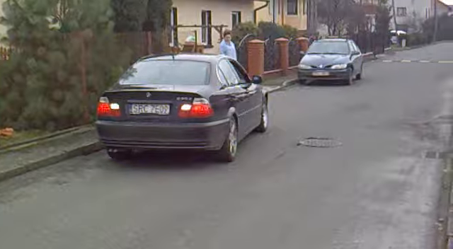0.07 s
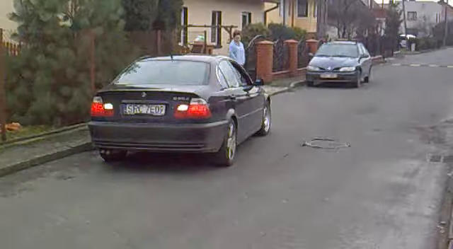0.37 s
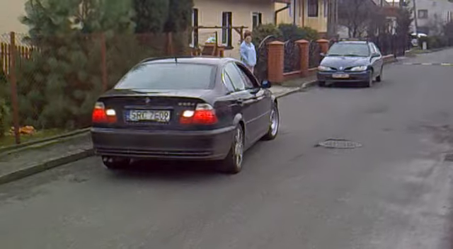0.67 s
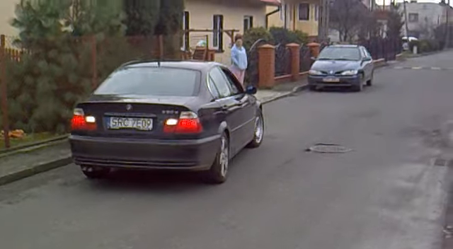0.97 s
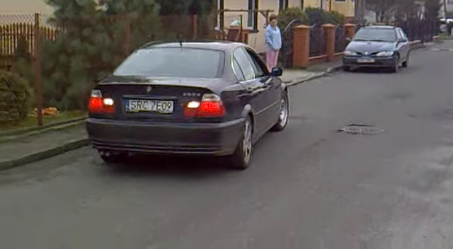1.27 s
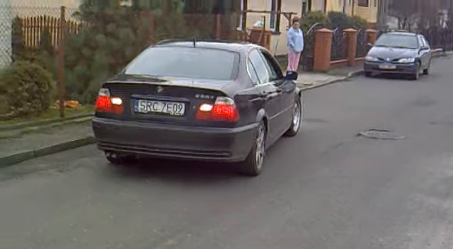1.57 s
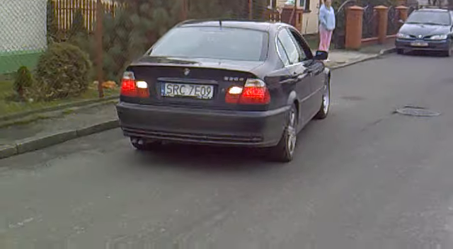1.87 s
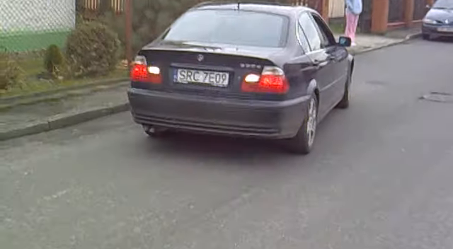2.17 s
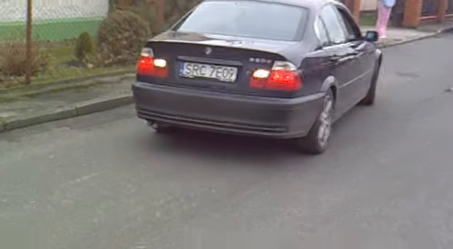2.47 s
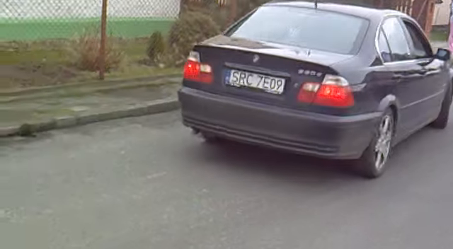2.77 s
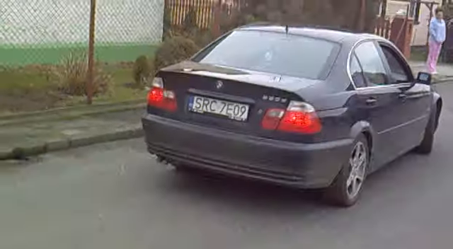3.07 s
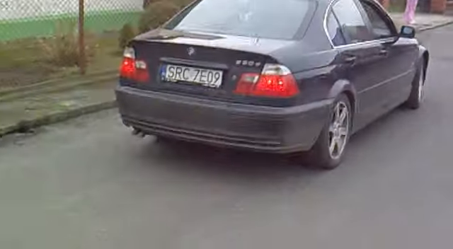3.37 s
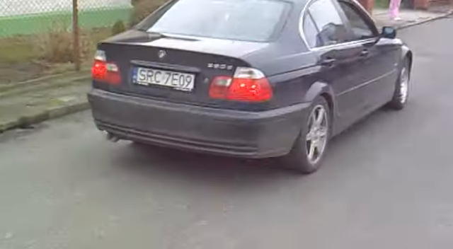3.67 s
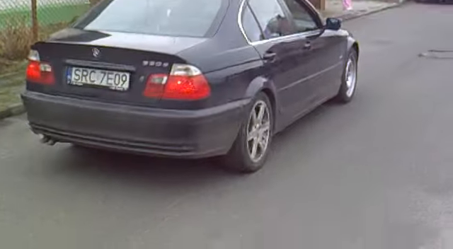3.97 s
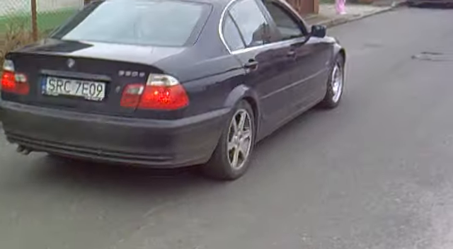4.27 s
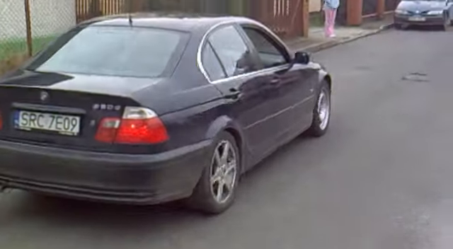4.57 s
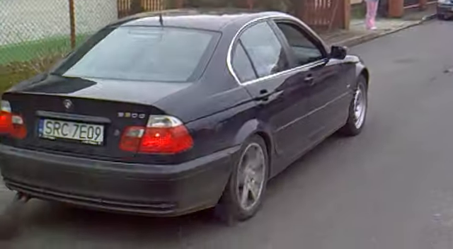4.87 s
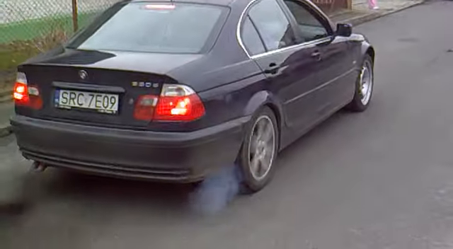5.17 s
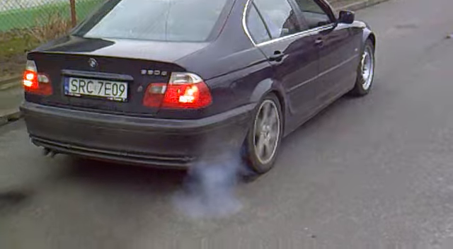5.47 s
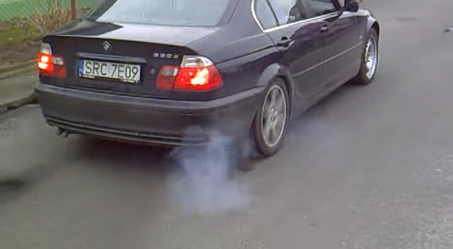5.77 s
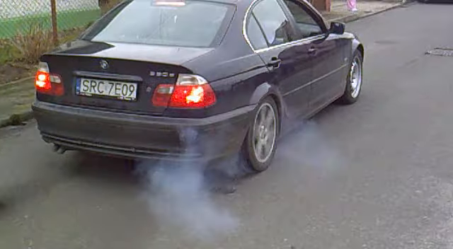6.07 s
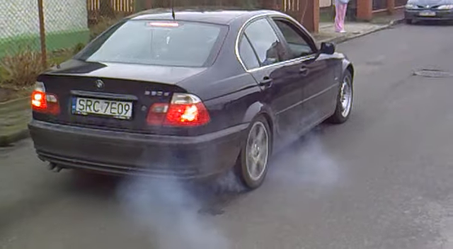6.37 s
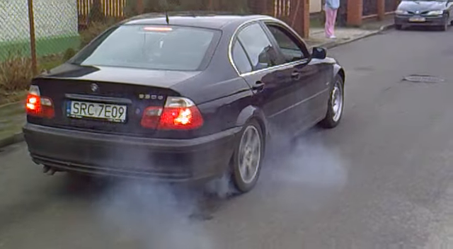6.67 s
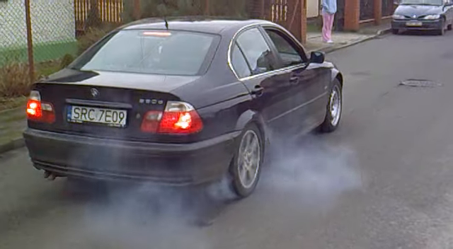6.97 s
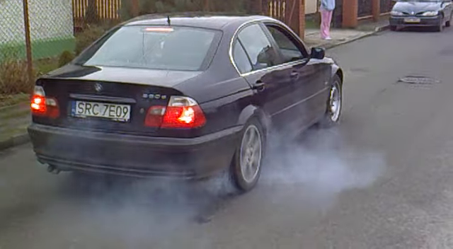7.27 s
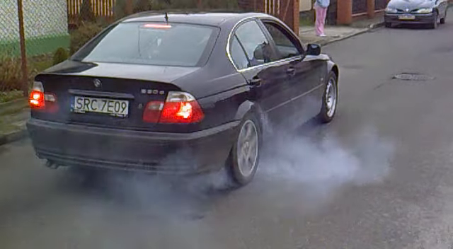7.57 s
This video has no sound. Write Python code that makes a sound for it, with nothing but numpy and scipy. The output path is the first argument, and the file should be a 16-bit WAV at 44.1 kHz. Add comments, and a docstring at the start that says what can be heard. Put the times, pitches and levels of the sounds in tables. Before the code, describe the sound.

A diesel car idles quietly on a street, then revs hard and spins its rear tyres in a loud, ragged screech.

```python
"""A quiet street between house fronts, heard through one small microphone. First, a hard double click.
The sound swells up: a six-cylinder diesel saloon backs at idle, exhaust humming under the engine's knock.
Gusts bump the microphone, small ticks sound close by, and the rolling tyres scuff faintly.
At 3.6 s the engine revs; at 4.9 s the rear tyres spin, and the rubber sticks and slips in a screech,
ragged, then steadier. The house fronts throw it back, and the loudest peaks overload the recorder."""
import sys
import numpy as np
from scipy import signal
from scipy.fft import rfft, irfft, next_fast_len
from scipy.io import wavfile

SR = 44100
rng = np.random.default_rng(int(sys.argv[2]) if len(sys.argv) > 2 else 0)


def master(y):
    """Save y as 16-bit WAV."""
    cut = np.clip(np.atleast_2d(y).T, -1, 1)
    pcm = np.round(cut * 32767)  # scale
    wavfile.write(sys.argv[1], SR, pcm.astype(np.int16))


N = 340452
T = np.arange(N) / SR
START_S = 0.234  # the street is first heard
LOAD_S, LOAD_RISE_S = 3.62, 0.31  # the throttle opens
SPIN_S, SPIN_RISE_S = 4.925, 0.029  # the tyres break loose


def amp(db):
    """Decibels to gain."""
    return np.exp(np.asarray(db) * (np.log(10) / 20))


def unit(x):
    """Scales to rms 1."""
    return x / np.sqrt(np.mean(x ** 2) + 1e-20)


def curve(rows):
    """Joins (time_s, value) points with straight lines."""
    return np.interp(T, *np.transpose(rows))


def ramp(start_s, length_s):
    """Rises from 0 to 1."""
    return np.clip((T - start_s) / length_s, 0, 1)


def swells(rows):
    """Smooth, passing lifts and dips in dB."""
    return sum(db * np.exp(-np.minimum(((T - s) / length) ** 2, 30)) for s, db, length in rows)


def add(mix, start_s, sound):
    """Mixes a sound in at start_s."""
    part = mix[round(start_s * SR):][:len(sound)]
    part += sound[:len(part)]


def coloured(x, points):
    """Filters x by (frequency_hz, level_db) points; the ends fall away steeply."""
    size = next_fast_len(len(x))
    hz = np.fft.rfftfreq(size, 1 / SR) + 1
    point_hz, point_db = np.transpose(points)
    gain = amp(np.interp(np.log(hz), np.log(point_hz), point_db))
    skirts = 1 / np.sqrt((1 + (point_hz[0] / hz / 1.3) ** 8) * (1 + (hz / point_hz[-1] / 1.3) ** 8))
    return irfft(rfft(x, size) * skirts * gain, size)[:len(x)]


def noise(points):
    """Noise of rms 1 with a given spectrum."""
    return unit(coloured(rng.standard_normal(N), points))


def drift(rate_hz, size=N):
    """Smooth random wander of rms about 1, mostly slower than rate_hz."""
    hz = np.fft.rfftfreq(8192, 1 / 1000)
    slow = irfft(rfft(rng.standard_normal(8192)) / np.sqrt(1 + (hz / rate_hz) ** 4))
    return np.interp(T[:size] * 1000, np.arange(len(slow)), unit(slow))


def resonate(x, hz, width_hz):
    """A steep resonance that can follow a moving pitch, scaled to rms 1."""
    carrier = np.exp(2j * np.pi * np.cumsum(hz * np.ones(len(x))) / SR)
    pole = np.exp(-np.pi * width_hz * np.sqrt(2) / SR)
    envelope = signal.lfilter([(1 - pole) ** 2], [1, -2 * pole, pole * pole], x / carrier + 1e-18)
    return unit((carrier * envelope).real)


# The two halves of the click: start_s, level_db, decay_s
CLICKS = [(0.0707, 1.5, 0.0019), (0.0729, -9, 0.00098)]
# Their spectrum: frequency_hz, level_db
CLICK_COLOUR = [(40, 0), (300, 0.5), (750, 4), (1800, -10), (5000, -6), (10000, -11.5), (15000, -21)]


def clicks():
    """A hard double click with no echo, before the street is heard."""
    out, t = np.zeros(N), np.arange(512) / SR
    for start_s, db, decay_s in CLICKS:
        burst = rng.standard_normal(len(t)) * np.exp(-t / decay_s)
        click = coloured(burst, CLICK_COLOUR) * np.exp(-t / 0.0019)
        add(out, start_s, amp(db) * click / abs(click).max())
    return out


# How hard the engine works: time_s, level_db
EFFORT = [(1.8, -53.5), (1.95, -50), (2.07, -47.5), (2.3, -53.5), (3.63, -53), (3.71, -37), (4.1, -48),
          (4.3, -36), (4.47, -36.5), (4.56, -27.5), (4.73, -23.5), (4.81, -17), (4.92, -16)]
IDLE_EFFORT_DB, FADE_IN_DB, FADE_IN_S, DROP_S = -53, -14, 1.49, 0.11


def follow_car(idle_db, effort_slope, spin_db):
    """Level in dB: swells up at the start, follows effort, and drops once the loud screech starts."""
    fade_in_db = FADE_IN_DB * (1 - ramp(START_S, FADE_IN_S)) ** 1.23
    effort_db = effort_slope * (curve(EFFORT) - IDLE_EFFORT_DB)
    return idle_db + fade_in_db + effort_db + spin_db * ramp(SPIN_S, DROP_S)


# Engine clatter at idle and under load, and its high rasp: frequency_hz, level_db
IDLE_COLOUR = [(130, -10.5), (180, 3), (215, -22), (300, -5), (400, -17), (550, -11.5), (720, -8),
               (840, -11), (1000, -13.5), (1350, -7.5), (2300, -10.5), (3000, -15.5), (6000, -30),
               (8000, -35)]
LOAD_COLOUR = [(200, -11), (350, -5), (440, -14), (670, -2.5), (780, -4.5), (900, -7.5), (1110, -13.5),
               (1490, -0.5), (2250, -5), (2700, -8), (4300, -17), (9500, -32), (12000, -50)]
RASP_COLOUR = [(2600, -3.5), (3300, 0.5), (3600, 2.5), (4200, -3), (4800, -9), (7000, -22.5)]
# Ringing of the engine bay: pitch_hz, width_hz, idle_db, load_db
BAY_MODES = [(744, 98, -5.5, -26), (892, 91, -23, -10), (1510, 330, -9.5, -8), (2135, 240, -16, -8),
             (3590, 110, -29, -14)]
# Brief flares of the rasp: centre_s, lift_db, half_length_s
RASP_FLARES = [(1.98, 10.5, .13), (3.38, 5, 0.12)]
RASP_FROM_HZ, RASP_DB_PER_HZ, RASP_TOP_DB = 127, 0.265, 12.5  # the rasp takes over at high speed


def clatter(knock, firing_hz, load):
    """Each firing knocks the block; under load the rattle brightens and other panels ring."""
    body = (amp(0.5) * (1 - load) * noise(IDLE_COLOUR) + amp(-2) * load * noise(LOAD_COLOUR)) * knock
    for hz, width_hz, idle_db, load_db in BAY_MODES:
        ring = resonate(knock * rng.standard_normal(N), hz, width_hz)
        body += amp(idle_db + load * (load_db - idle_db)) * ring
    body *= amp(follow_car(idle_db=-51, effort_slope=1, spin_db=-13.5))
    speed_db = np.clip(RASP_DB_PER_HZ * (firing_hz - RASP_FROM_HZ), 0, RASP_TOP_DB)
    rasp_db = follow_car(idle_db=-64, effort_slope=0.85, spin_db=-10) + speed_db + swells(RASP_FLARES)
    rasp = amp(rasp_db) * knock * noise(RASP_COLOUR)
    flicker_db = 0.98 * drift(34) + 0.5 * drift(11.5)
    return (body + rasp) * amp(flicker_db)


# Hiss of the engine: frequency_hz, level_db
HISS_COLOUR = [(5000, 5), (7000, -3), (10000, 0.5), (13000, 1), (15500, 5)]


def engine_hiss():
    """A thin hiss above the clatter, rising a little with effort."""
    return amp(follow_car(idle_db=-65, effort_slope=0.25, spin_db=-13)) * noise(HISS_COLOUR)


# Exhaust overtones: multiple_of_engine_cycle, low_speed_db, high_speed_db
OVERTONES = [(5, -18, -11), (7, -22, 4), (8, -18, -6), (9, -20, 2), (10, -13, -2.5), (11, -39, 5),
             (12, 1, 3), (13, -4, 0), (18, -2.5, -3), (21, -20, 0), (22, -20, -7), (23, -18, -15),
             (24, -16, -28), (30, -11.5, -2)]
# Resonances and a notch of the pipe: pitch_hz, half_width_hz, lift_db
PIPE = [(158.6, 6.5, 7.5), (269.6, 6, 4.5), (309, 15.1, 3.5), (344, 25, 2.5), (442, 49, -15)]
# Passing booms of the exhaust: centre_s, lift_db, half_length_s
BOOMS = [(1.9, 7.5, 0.48), (4.27, 4, 0.037), (5.35, 2, 0.14)]
CYLINDERS, IDLE_HZ = 6, 37.5
SILENCER_DB_PER_OCTAVE, OVERTONE_LOAD_DB = -15.5, 6.5  # fast firing is damped; load hardens the pulses


def exhaust(firings, firing_hz, load):
    """Firing tone and overtones through the pipe; at speed, unequal cylinders fill the lines between."""
    def pipe_db(multiple):
        return sum(db / (1 + ((multiple * firing_hz - hz) / width) ** 2) for hz, width, db in PIPE)
    fast = np.clip((firing_hz - 70) / 105, 0, 1)
    boom_db = swells(BOOMS)
    tone_db = follow_car(idle_db=-41, effort_slope=1.203, spin_db=-13) + 0.32 * boom_db
    tone_db += SILENCER_DB_PER_OCTAVE * np.log2(firing_hz / IDLE_HZ) + pipe_db(0.93)
    overtone_db = follow_car(idle_db=-62, effort_slope=0.64, spin_db=-13) + boom_db
    overtone_db += OVERTONE_LOAD_DB * load
    out = amp(tone_db) * np.sin(2 * np.pi * firings)
    for order, low_db, high_db in OVERTONES:
        multiple = order / CYLINDERS
        level_db = overtone_db + low_db + fast * (high_db - low_db) + pipe_db(multiple) + 2.8 * drift(6)
        cycles = multiple * firings + rng.random() + 0.0073 * multiple * drift(26)
        out += amp(level_db) * np.sin(2 * np.pi * cycles)
    return np.sqrt(2) * out


# Low buffeting at the microphone: frequency_hz, level_db
RUMBLE_COLOUR = [(18, -13.5), (35, 3.5), (60, 4.5), (110, -2), (180, 3), (280, -6), (450, -14.5),
                 (900, -15.5), (2000, -58)]
# Gusts across the microphone: centre_s, level_db, rise_and_fall_s
GUSTS = [(2.03, -39.5, 0.13), (3.69, -37, 0.041), (4.96, -27, 0.15)]
# Single pushes of air on it: centre_s, level_db, rise_and_fall_s
BUMPS = [(1.897, -22.5, 0.0026), (1.97, -24, 0.0027), (2.037, -18, 0.0024), (2.139, -31, 0.0038),
         (3.659, -21, 0.0038), (3.702, -13.5, 0.0015)]


def wind():
    """Air on the microphone: a lumpy rumble that grows with the car's sound, gusts and short bumps."""
    level = amp(follow_car(idle_db=-56, effort_slope=0.41, spin_db=-1.5))
    level += sum(amp(db) * np.exp(-abs(T - s) / length) for s, db, length in GUSTS)
    out = level * amp(2.1 * drift(25)) * noise(RUMBLE_COLOUR)
    for centre_s, db, length_s in BUMPS:
        offset = np.minimum(abs(T - centre_s) / length_s, 40)
        out += amp(db) * (1 - offset / 2) * np.exp(-offset)
    return out


def street_echoes(x, taps_per_s=1500, first_s=0.012, reverb_s=0.47):
    """Scattered, dull echoes from fences and house fronts."""
    t = np.arange(SR // 2) / SR
    taps = rng.standard_normal(len(t)) * (rng.random(len(t)) < taps_per_s / SR)
    taps *= (t > first_s) * amp(-60 * t / reverb_s)
    taps = coloured(taps, [(100, 2.5), (1500, 1.5), (4000, -6.0), (12000, -5.5)])
    return signal.fftconvolve(x, taps / np.linalg.norm(taps))[:N]


# Small ticks near the microphone: start_s, level_db, pitch_hz
TICKS = [(0.585, -39.5, 6000), (0.7371, -44, 4100), (0.98, -48, 3400), (1.07, -37, 2000),
         (1.1151, -29, 3360), (1.116, -35, 800), (1.163, -36, 5900), (1.191, -47, 5200), (2.319, -41, 5544),
         (2.519, -37, 1987), (4.758, -10, 4220)]
# Spectrum of their crack: frequency_hz, level_db
TICK_COLOUR = [(500, 9), (1500, 8), (3000, 2), (7000, -8), (10000, -14), (15000, -21)]


def ticks():
    """Close, dry ticks, each a crack with a brief ring."""
    out, t = np.zeros(N), np.arange(1024) / SR
    for start_s, db, hz in TICKS:
        crack = rng.standard_normal(len(t)) * np.exp(-t / 0.0011) * (1 - np.exp(-t / 0.00058))
        tick = resonate(crack, hz, width_hz=1100) + 2.3 * unit(coloured(crack, TICK_COLOUR))
        add(out, start_s, amp(db + 0.5) * tick / abs(tick).max())
    return out


# Rolling tyres scuffing the road: centre_s, level_db, half_length_s
SCUFFS = [(3.07, -63, .06), (3.382, -54, .08)]
# Their spectrum: frequency_hz, level_db
SCUFF_COLOUR = [(1000, 0), (1400, 20), (2000, -2), (6000, 1), (8000, -15)]


def scuffs():
    """Faint rustles of rubber as the car creeps."""
    level = sum(amp(db) * np.exp(-((T - s) / length) ** 2) for s, db, length in SCUFFS)
    return level * noise(SCUFF_COLOUR)


# Swells of the engine bay's drone: centre_s, lift_db, half_length_s
DRONE_SWELLS = [(4.94, 2, .04), (5.25, 9, 0.31), (7.27, 11.5, 0.28)]


def bay_drone(knock, load):
    """Once the throttle opens, the knocks ring a hollow resonance of the engine bay."""
    level_db = follow_car(idle_db=-67, effort_slope=1.218, spin_db=-13) + swells(DRONE_SWELLS)
    return load * amp(level_db) * resonate(knock * rng.standard_normal(N), hz=667, width_hz=80)


def stick_slip(hz, ragged, patches, burst_db, burst_hz, jitter, size=N):
    """Tread patches stick and slip in bursts; ragged (slow) and jitter (fast) are shares of pitch."""
    out = np.zeros(size)
    for _ in range(patches):
        pitch_hz = hz * (1 + ragged * drift(14, size) + jitter * drift(261.2, size))
        phase = 2 * np.pi * np.cumsum(pitch_hz) / SR
        bursts = amp(burst_db * np.tanh(drift(burst_hz, size)))
        out += bursts * (np.sin(phase) + amp(-41) * np.sin(2 * phase))
    return unit(out)


# The main screech: time_s, pitch_hz
SCREECH_PITCH = [(4.92, 1650), (5.14, 1771), (5.28, 1545), (5.44, 1660), (5.58, 1565), (5.79, 1779),
                 (5.95, 1490), (6.04, 1622), (6.15, 1448), (6.27, 1690), (6.56, 1685), (6.76, 1590),
                 (6.87, 1680), (7.03, 1585), (7.3, 1620), (7.46, 1588), (7.58, 1696), (7.72, 1580)]
# Dips as the tyre skates: centre_s, change_db, half_length_s
SKATES = [(5.06, -4, 0.025), (5.61, -5.5, .035), (6.02, -2, 0.095), (6.34, -2.5, 0.028), (6.87, 0, 0.037),
          (7.75, 0, 0.099)]
# The lower howl swells and drops out: centre_s, change_db, half_length_s
HOWL_SWELLS = [(5.3, -1, 0.076), (6.68, -29, 0.11), (7.3, 3, 0.37)]
# Scrubbing rubber and flying grit: frequency_hz, level_db
SCRUB_COLOUR = [(350, -23.5), (480, -22.5), (660, -15.5), (830, -20), (1100, -2.5), (1500, 2), (2000, -0.5),
                (2400, -5), (3000, -12), (4000, -18.5), (6000, -25), (9000, -57)]
GRIT_COLOUR = [(2650, -11), (4500, -2), (5650, -3.5), (15500, -24.5)]
SCREECH_DB, HEAT_DB_PER_S = -15, 0.5  # the screech firms up as the rubber heats
HOWL_HZ, HOWL_DB, CORE_DB = 1204, -21, -17


def sliding_rubber(age_s, bite, ragged):
    """Tread screeches over scrub and grit; one firm patch holds the pitch, stiff shoulders sing above."""
    pitch_hz, skate_db = curve(SCREECH_PITCH), swells(SKATES)
    screech = stick_slip(pitch_hz, ragged, patches=4, burst_db=5, burst_hz=27.2, jitter=0.03)
    howl = stick_slip(HOWL_HZ, ragged, patches=4, burst_db=8.5, burst_hz=27.3, jitter=0.0412)
    core = stick_slip(pitch_hz, ragged=0.015, patches=1, burst_db=7, burst_hz=20, jitter=0.02)
    shoulders = stick_slip(1.27 * pitch_hz, ragged=0.1, patches=3, burst_db=5, burst_hz=34.6, jitter=0.022)
    out = amp(SCREECH_DB + HEAT_DB_PER_S * age_s) * screech + amp(CORE_DB) * core
    out += amp(HOWL_DB + swells(HOWL_SWELLS)) * howl
    scrub_db = -14 + 4.5 * bite
    out += amp(scrub_db - 4) * shoulders
    out += amp(scrub_db + 1.3 * drift(65)) * noise(SCRUB_COLOUR)
    grit_db = -29.5 + 10 * np.exp(-age_s / 0.14) + 1.1 * skate_db
    spurts_db = 1.1 * drift(240) + 1.06 * drift(26)
    return amp(skate_db) * out + amp(grit_db + spurts_db) * noise(GRIT_COLOUR)


# Harmonics of the tread whine: multiple, width_hz, level_db
TREAD_HARMONICS = [(6, 130, -0.5), (7, 82, 4), (8, 140, 0), (10, 68, -0.5), (12, 57, -1.5)]
# The whine comes forward or falls back: centre_s, change_db, half_length_s
WHINE_SWELLS = [(6.4, 2, 0.056), (7.15, 3, 0.23), (7.72, -12, 0.4)]
WHINE_DB, TREAD_PER_FIRING = -31, 1.957
SLIP_TREAD_HZ, CLUTCH_S, CLUTCH_CLOSE_S = 335, 5.45, 0.22


def tread_whine(firing_hz, ragged):
    """Tread blocks slap the road, near one rate while the clutch slips, then in step with the engine."""
    clutch = ramp(CLUTCH_S, CLUTCH_CLOSE_S)
    tread_hz = SLIP_TREAD_HZ + clutch * (TREAD_PER_FIRING * firing_hz - SLIP_TREAD_HZ)
    tread_hz *= 1 + 0.11 * ragged * drift(11)  # the wheel snatches as its grip changes
    whine_db = WHINE_DB + swells(WHINE_SWELLS)
    out = np.zeros(N)
    for multiple, width_hz, db in TREAD_HARMONICS:
        level = amp(whine_db + db + 2.8 * drift(7.1))
        out += level * resonate(rng.standard_normal(N), multiple * tread_hz, width_hz)
    return out


# Squeals where the tyre grabs: centre_s, pitch_hz, level_db, half_length_s
SQUEALS = [(4.984, 966, -16.5, 0.079), (5.111, 1890, -13, .04), (5.2, 784, -18, 0.027),
           (5.237, 1566, -15, 0.042), (5.54, 1581, -11.5, .03), (5.708, 987, -23.5, 0.035),
           (5.789, 1800, -9.5, .04), (5.86, 1206, -10.5, .025), (5.951, 1442, -13, 0.031),
           (6.003, 964, -20.5, 0.099), (6.15, 1418, -7.5, .04), (6.259, 1129, -13.5, 0.039),
           (6.267, 978, -14, .04), (6.47, 1197, -13, .06), (6.499, 969, -21, .06),
           (6.561, 1688, -15.5, 0.066), (6.739, 1592, -14, 0.065), (7.15, 1123, -13.5, .15),
           (7.472, 1206, -11.5, 0.043)]


def squeals():
    """Short grabs of the rubber, each swelling and fading around one pitch."""
    out = np.zeros(N)
    for centre_s, hz, db, half_s in SQUEALS:
        t = np.arange(-3 * half_s, 3 * half_s, 1 / SR)
        voice = stick_slip(hz, ragged=0.02475, patches=2, burst_db=2, burst_hz=30.6,
                           jitter=0.0357, size=len(t))
        add(out, centre_s + t[0], amp(db) * np.exp(-(t / half_s) ** 2) * voice)
    return out


def wheelspin(firing_hz, ragged_first=0.1, ragged_last=0.048, settle_s=0.55):
    """The rear tyres break loose, bite hard and settle into a steadier slide."""
    age_s = np.maximum(T - SPIN_S, 0)
    bite = np.exp(-age_s / settle_s)
    ragged = ragged_last + (ragged_first - ragged_last) * bite
    tyres = sliding_rubber(age_s, bite, ragged) + tread_whine(firing_hz, ragged) + squeals()
    return ramp(SPIN_S, SPIN_RISE_S) * tyres


# Engine speed: time_s, firing_hz
FIRING = [(0.72, 38), (1.3, 36.62), (2.3, 37.04), (2.6, 38.8), (3.6, 37.75), (3.8, 67.1), (4.2, 64.66),
          (4.6, 132.5), (4.9, 204.3), (5.08, 201), (5.27, 209), (5.42, 196), (5.64, 172.3), (6.0, 177.7),
          (6.4, 168.8), (7.0, 177.5), (7.25, 183.4), (7.72, 182.8)]


def scene():
    """The car and its echoes out in the street, with air and ticks close at the microphone."""
    firing_hz = curve(FIRING) * (1 + 0.00396 * drift(12.9))
    firings = np.cumsum(firing_hz) / SR
    load = ramp(LOAD_S, LOAD_RISE_S)
    strength = amp(2.3 * rng.standard_normal(4096))[firings.astype(int)]  # no two firings alike
    knock = unit(2.1 + strength * np.exp(-(firings % 1) / 0.63))
    engine = clatter(knock, firing_hz, load) + engine_hiss() + bay_drone(knock, load)
    car = engine + wheelspin(firing_hz) + scuffs()
    street = amp(-1) * car + amp(-13.5) * street_echoes(car) + exhaust(firings, firing_hz, load)
    outdoors = street + wind() + ticks()
    return (ramp(START_S, 0.0015) * outdoors + clicks())[None]


def record(dry):
    """The recorder's input stage rounds off the loudest peaks; a low-pass trims the top treble."""
    ceiling, knee, edge_hz = 0.71, 9, 15800
    clipped = dry / (1 + abs(dry / ceiling) ** knee) ** (1 / knee)
    lowpass = signal.firwin(511, edge_hz, window=("kaiser", 9), fs=SR)
    return signal.oaconvolve(clipped, lowpass[None], "same")


dry = scene()
out = record(dry)
master(out)
```